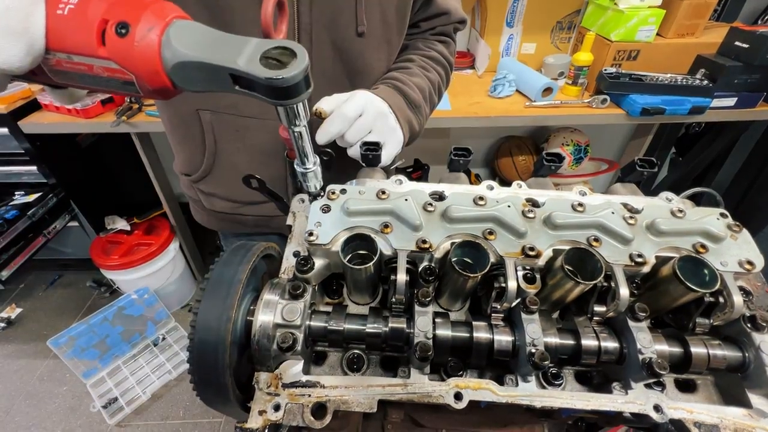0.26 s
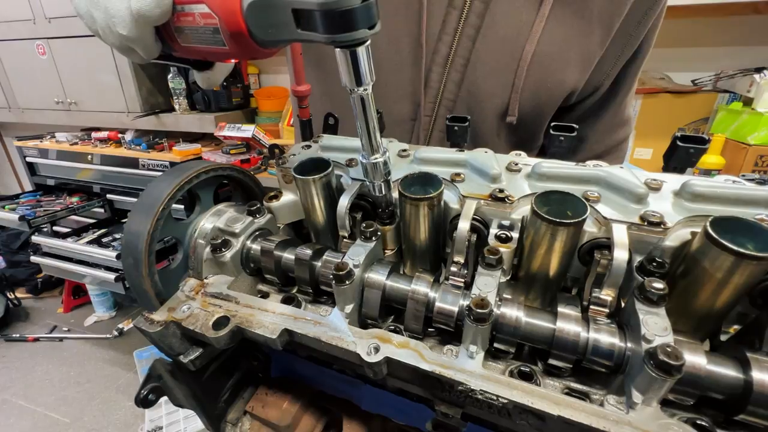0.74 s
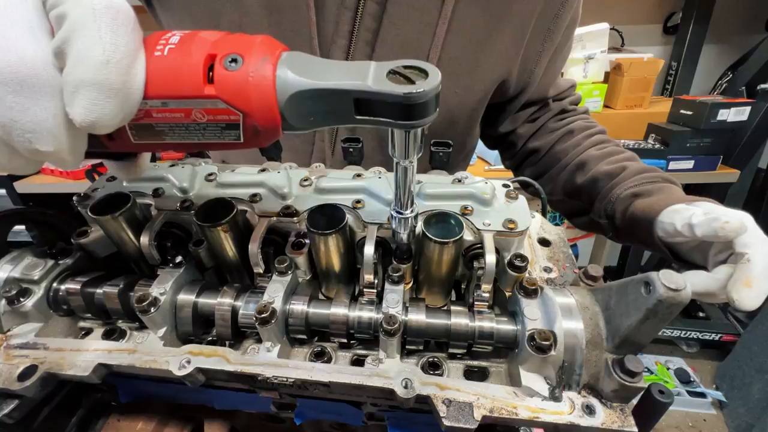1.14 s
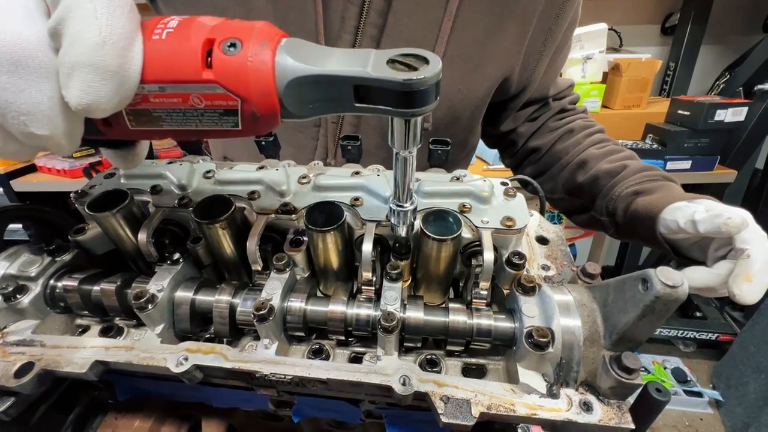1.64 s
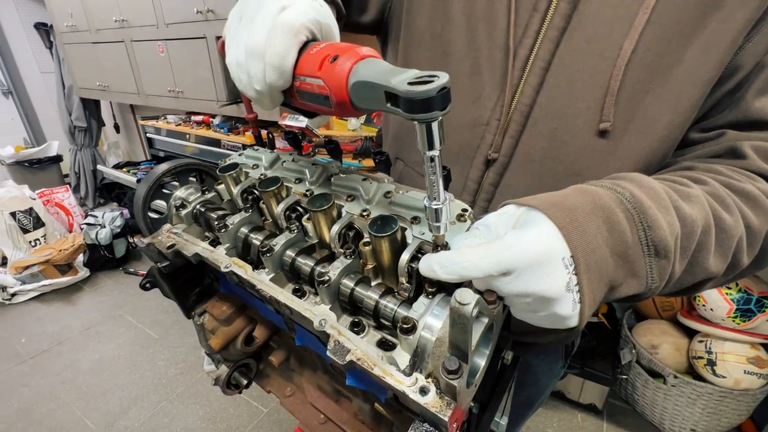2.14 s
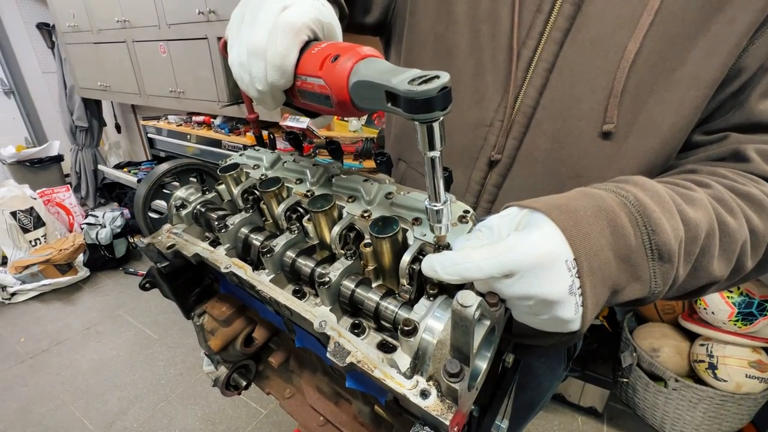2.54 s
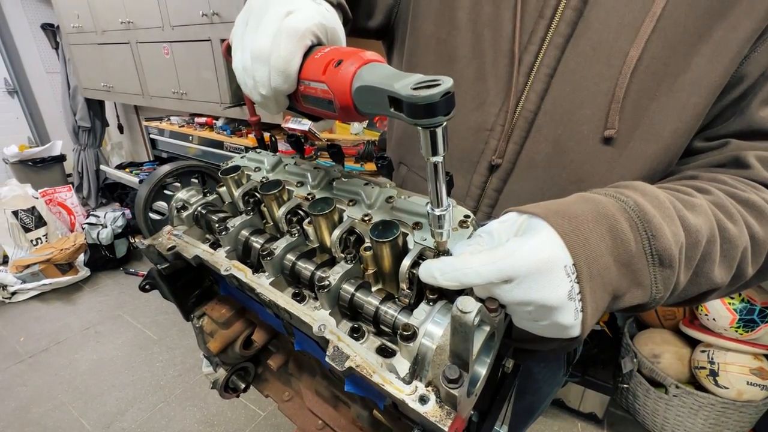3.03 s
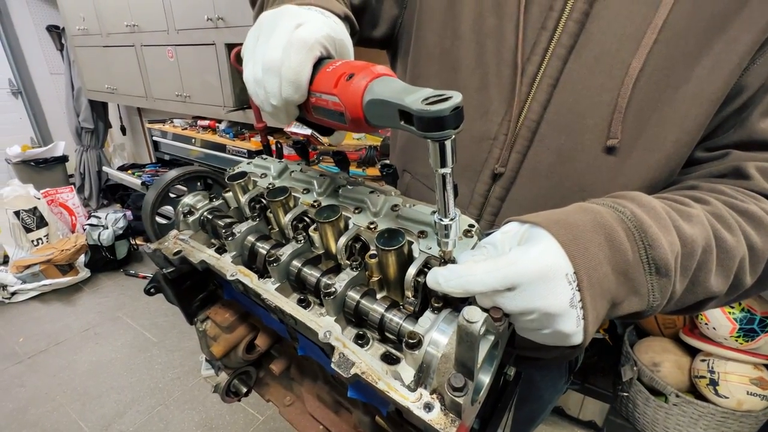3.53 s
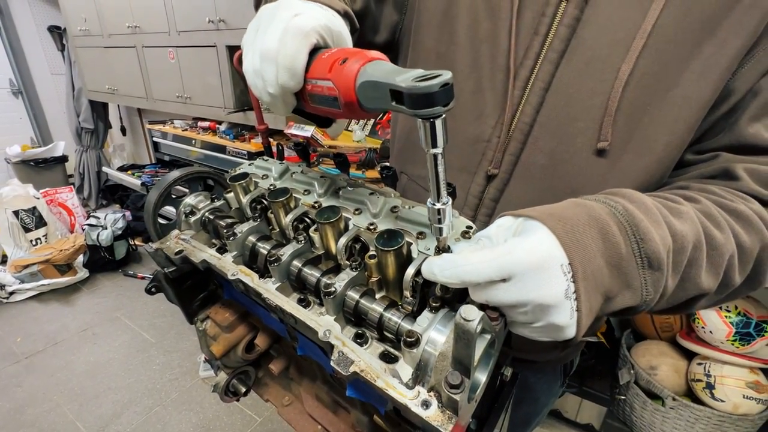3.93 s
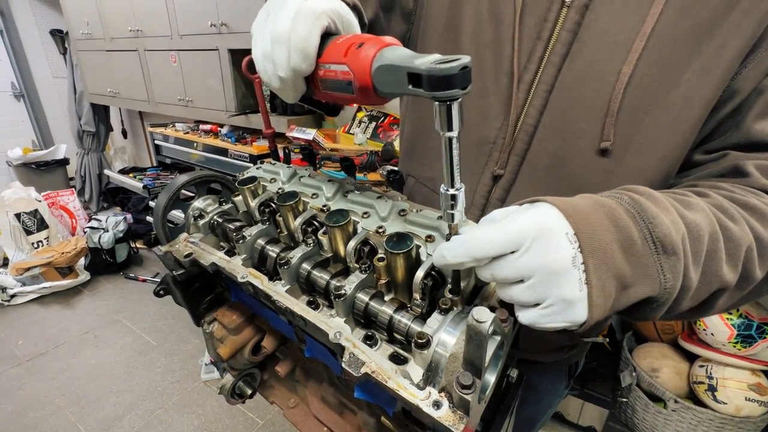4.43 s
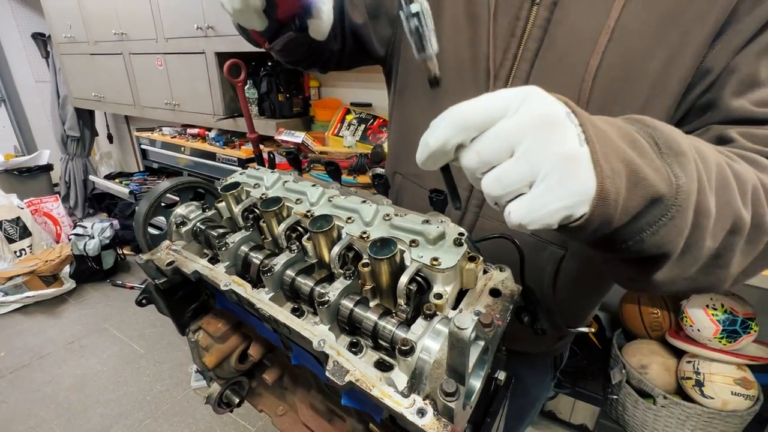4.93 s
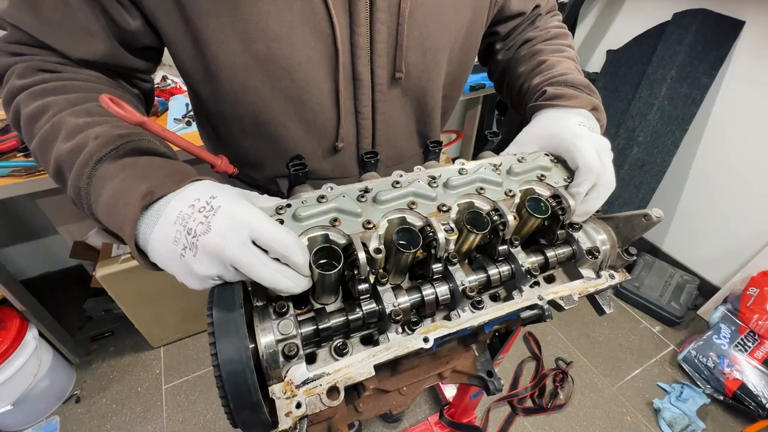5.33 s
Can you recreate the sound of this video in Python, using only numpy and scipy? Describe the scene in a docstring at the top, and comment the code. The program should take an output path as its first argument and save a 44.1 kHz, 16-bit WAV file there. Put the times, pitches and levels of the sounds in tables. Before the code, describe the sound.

Close harsh power-ratchet rasp in a garage, four butted fast runs, a slower clicking run cut off, then light socket rattle and metal clacks.

```python
"""A cordless ratchet spins bolts out of a cylinder head in a garage: four short runs at full speed, then a slow
one that stops dead. Its pawl skips three teeth on each back stroke, as noise puffs through resonances; gears
are swelling noise and tones. Then the socket is jiggled off the bolt and the cam carrier knocked loose, as
noise bursts and decaying modes, over low background noise and hiss. Two microphone ports hear the tool directly
and through the garage's echo."""
import sys
import numpy as np
from scipy import signal
from scipy.fft import rfft, irfft, next_fast_len
from scipy.io import wavfile
from scipy.ndimage import uniform_filter1d, map_coordinates

SR = 44100
rng = np.random.default_rng(int(sys.argv[2]) if len(sys.argv) > 2 else 0)


def generate_wav(signal):
    """Clip the signal to [-1, 1] and save it as 16-bit WAV at the path in sys.argv[1]."""
    frames = np.transpose(np.atleast_2d(signal))
    scaled = np.clip(frames, -1, 1) * 32767
    pcm = np.round(scaled).astype(np.int16)
    wavfile.write(sys.argv[1], SR, pcm)


N = 245637
FAST_END_S, SLOW_STOP_S, CARRIER_START_S = 1.733, 3.292, 5.19

# Three teeth dropping, then the pawl reseating [share of a stroke]
TEETH = [0, .093, .21, .4]
# Pawl resonances: (f/Hz, width/Hz, relative level/dB)
PAWL = [(9500, 1700, -13), (12930, 1800, 4), (14450, 1880, 6), (16230, 760, -3.5)]
# Fast runs: (start t/s, gear rasp level/dB, housing hum and rumble over the rasp/dB,
# relative pawl level/dB, a last column that is not played [s])
FAST_RUNS = [(0, -20, -12, -25.5, -26.5, 0.14), (0.348, -23, -11.5, -38, -23, .385),
             (.707, -21, -11.5, -30.5, -21.5, 1), (1.167, -18.5, -11.5, -26.5, -23, 1.28)]
# Fast drive: (t/s, stroke rate/Hz)
FAST_SPEED = [(0, 96.7), (.19, 83.1), (.34, 83.7), (.35, 88.6), (.4, 83.1), (.5, 76.9), (.6, 71.9),
              (.7, 69.6), (.712, 67.4), (.85, 67.9), (.9, 69), (.952, 76.4), (1.03, 84), (1.16, 84.7),
              (1.18, 95.1), (1.26, 92.5), (1.39, 94.3), (1.73, 94.5)]
# Single hard pawl snaps: (t/s, relative level/dB)
SNAPS = [(0.385, -8), (0.925, -13.5), (1.443, -9.5)]
# Colour of the fast gear rasp: (f/Hz, relative level/dB)
FAST_RASP = [(1300, -7.5), (1800, -3), (2200, -7), (2700, 0), (3400, 1.5), (4300, -3), (5000, 1.5),
             (5900, 0), (7000, -3), (8300, -2), (10000, -1.5), (11500, -0.5), (13000, -0.5), (16000, -32)]
# Housing resonances at speed, passed twice: (f/Hz, width/Hz, level per pass/dB)
FAST_HUM = [(747, 265, -3.5), (1040, 234, 2), (1540, 950, -7)]
# Gear mesh tone under load: (t/s, level/dB)
FAST_MESH = [(.3, -43.5), (.35, -33.5), (.42, -34), (0.599, -27.5), (0.701, -33), (0.711, -25), (.9, -24.5),
             (.952, -25), (0.961, -37.5), (1.03, -36.5)]
FAST_RASP_PER_OCTAVE_DB = 4.5  # rasp growth with speed inside a run
MESH_CYCLES_PER_STROKE = 14.4


def fast_runs():
    """At full speed the three teeth of each stroke merge into a buzz over gear rasp and a mesh tone."""
    rate, = curves(FAST_SPEED)
    stroke = np.cumsum(rate) / SR
    runs = np.array(FAST_RUNS)
    run = np.searchsorted(runs[:, 0] * SR, np.arange(N), side="right") - 1
    start, rasp_db, hum_db, rumble_db, pawl_db = runs[run].T[:5]
    octaves = np.log2(rate / rate[(start * SR).astype(int)])
    rasp_db = rasp_db + FAST_RASP_PER_OCTAVE_DB * octaves + 0.24 * wobble(13.27)
    pawl_db = pawl_db + 2.6 * wobble(40)

    # the clicks scatter in time and level
    first = np.flatnonzero(np.diff(np.floor(stroke)) > 0)
    chance = rng.standard_normal((len(first), 2, len(TEETH)))
    times = first[:, None] / SR + (np.array(TEETH) + 0.049 * chance[:, 0]) / rate[first, None]
    levels = pawl_db[first, None] + 4.3 * chance[:, 1] + [4.5, -0.5, -12.0, -3.5]
    snap_s, snap_db = np.transpose(SNAPS)
    times, levels = np.append(times, snap_s), np.append(levels, snap_db)
    pawl = resonant(bursts(times, levels + 22.0, 0.0042, clean=0.37, rise=0.0011), PAWL)

    hum_db = hum_db + 0.6 * wobble(9.3)
    rumble_db = rumble_db + 1.5 * wobble(15)
    rasp, hum = gears(stroke, FAST_RASP, FAST_HUM, hum_db, rumble_db, swell_db=0.5, swell_at=0.49,
                      grit_db=7.5, knock_db=11.5, thump=0.11)
    span = (FAST_MESH[0][0], FAST_MESH[-1][0])
    mesh = tone(MESH_CYCLES_PER_STROKE * rate, curves(FAST_MESH)[0], span, waver_hz=1.5, flutter_db=0.7)

    # each run has its own gear level, echo included
    gear = heard(rasp, glint_db=-5.5) + heard(hum, wet_db=-3.5, glint_db=-10.5)
    running = amp(rasp_db) * gear + heard(pawl) + direct(mesh, glint_db=-26)
    return between(0, FAST_END_S) * running


# Slow drive: (t/s, stroke rate/Hz)
SLOW_SPEED = [(1.7394, 20.11), (1.854, 25.9), (1.935, 17.52), (2.081, 34.31), (2.309, 33.42),
              (2.558, 30.81), (2.783, 31.68), (2.945, 44.22), (3.3, 43.91)]
# How hard the pawl drops: (t/s, relative level/dB)
SLOW_PAWL = [(1.78, -3.5), (1.83, -2), (2.11, 3.5), (2.19, -4), (2.28, -2.5), (2.36, 4), (2.41, -6.5),
             (2.5, 0), (2.58, -0.5), (2.67, 4.5), (2.75, -6), (2.84, -1.5), (2.92, 2), (2.99, -5.5),
             (3.08, -0.5), (3.16, 0.5), (3.21, -0.5), (3.29, -1)]
# Colour of the slow gear rasp: (f/Hz, relative level/dB)
SLOW_RASP = [(1300, -3), (1900, -3.5), (2500, -2.5), (3400, -0.5), (4300, -2.5), (5000, -0.5), (5900, 0),
             (7000, -4), (8300, -2.5), (10000, -5), (11500, -1.5), (13000, -8), (14500, -4.5), (16000, -9)]
# Housing resonances at low speed, passed twice: (f/Hz, width/Hz, level per pass/dB)
SLOW_HUM = [(751, 150, -2.5), (937, 184, -3), (1052, 120, 0.5), (1267, 220, -2.5), (1444, 365, -7)]
# Motor whine: (t/s, f/Hz)
WHINE = [(1.8, 8200), (1.85, 8250), (1.96, 8160), (2.06, 8360), (2.3, 8390), (2.5, 8340), (2.78, 8350),
         (2.92, 8520), (3.26, 8540)]
# Gear mesh tone: (t/s, f/Hz, level/dB)
SLOW_MESH = [(2.04, 940, -48.5), (2.2, 1010, -42.5), (2.4, 945, -42), (2.55, 926, -48), (2.7, 904, -45),
             (2.85, 990, -49)]
# A narrow hollow in the gear noise: (f/Hz, width/Hz, depth 0-1)
SLOW_DIP = [(1100, 52, .8)]
# Relative levels of the three teeth and the softer reseating [dB]
SLOW_TEETH_DB = [-11, -10.5, -10, -22]
SLOW_RASP_DB, SLOW_HUM_DB = -29.5, -36  # at 32 strokes per s
SLOW_RASP_PER_OCTAVE_DB, SLOW_HUM_PER_OCTAVE_DB = 5.5, 6  # growth with speed
SLOW_RUMBLE_DB, WHINE_DB, TOOTH_SCATTER_DB = -62.5, -43.5, 3.5


def slow_run():
    """With the trigger eased, every stroke is heard as three clicks until the motor brakes."""
    rate, = curves(SLOW_SPEED)
    stroke = np.cumsum(rate * (np.arange(N) >= SLOW_SPEED[0][0] * SR)) / SR
    count = np.arange(int(stroke[int(SLOW_STOP_S * SR)]) + 1)
    times = np.interp(count[:, None] + TEETH, stroke, np.arange(N) / SR)
    scatter_db = TOOTH_SCATTER_DB * np.tanh(rng.standard_normal(times.shape))
    levels = np.interp(times, *np.transpose(SLOW_PAWL)) + SLOW_TEETH_DB + scatter_db
    kept = times < SLOW_STOP_S
    pawl = resonant(bursts(times[kept], levels[kept] + 7.5, 0.0028, clean=2.8, rise=0.0003), PAWL)

    octaves = np.log2(rate / 32)
    rasp_db = SLOW_RASP_DB + SLOW_RASP_PER_OCTAVE_DB * octaves
    hum_db = SLOW_HUM_DB + SLOW_HUM_PER_OCTAVE_DB * octaves
    rasp, hum = gears(stroke, SLOW_RASP, SLOW_HUM, hum_db - rasp_db, SLOW_RUMBLE_DB - rasp_db,
                      swell_db=6.5, swell_at=0.085, grit_db=6.0, knock_db=20, thump=0.019)
    whine_span = (WHINE[0][0], WHINE[-1][0])
    whine_db = WHINE_DB + 2.4 * wobble(8.24)
    whine = tone(curves(WHINE)[0], whine_db, whine_span, waver_hz=5.2, flutter_db=-1.0)
    mesh_span = (SLOW_MESH[0][0], SLOW_MESH[-1][0])
    mesh = tone(*curves(SLOW_MESH), mesh_span, waver_hz=8, flutter_db=3.5)

    on = between(0, SLOW_STOP_S)
    gear = heard(rasp * on, glint_db=-5) + heard(hum * on, wet_db=-0.5, glint_db=-10)
    running = amp(rasp_db) * notched(gear, SLOW_DIP)
    running = running + heard(pawl, glint_db=-21.0) + direct(whine + mesh, glint_db=-11)
    return between(FAST_END_S, 9) * running


# Colour of the tool's low rumble: (f/Hz, relative level/dB)
RUMBLE = [(25, -30), (70, -8), (190, -3.5), (300, -1.5), (550, 2), (800, -3.5)]
# The tool's shaking at 1-7 times the stroke rate: relative level/dB
SHAKE_DB = [1.5, 2, 1, 0.5, -2.5, -1, -3.5]


def gears(stroke, rasp, hum, hum_db, rumble_db, swell_db, swell_at, grit_db, knock_db, thump):
    """Gear noise swells once a stroke; the yoke knocks as it takes up the load."""
    swell = amp(swell_db * np.cos(2 * np.pi * (stroke - swell_at)) + 0.7 * wobble(14))
    grit = amp(grit_db * np.tanh(wobble(900)))  # tooth contacts make the noise spiky
    turn = np.flatnonzero(np.diff(np.floor(stroke - TEETH[3])) > 0) / SR
    knock_levels = knock_db + 2.5 * wobble(80)[(turn * SR).astype(int)]
    knocks = bursts(turn, knock_levels, 0.004, clean=1.5, rise=0.0005)
    drive = unit(swell * grit * rng.standard_normal(N)) + knocks

    housing_noise = amp(0.35 * wobble(29.0)) * np.sqrt(swell) * rng.standard_normal(N)
    body = unit(resonant(resonant(housing_noise, hum), hum))

    # the rocking yoke shakes the tool at multiples of the stroke rate
    shake = np.zeros(N)
    for order, db in enumerate(SHAKE_DB, start=1):
        level = amp(db + 2.4 * wobble(22))
        shake += level * np.sin(2 * np.pi * order * stroke + 0.8 * wobble(10))
    low = shaped(np.sqrt(swell) * rng.standard_normal(N) + thump * shake, RUMBLE)
    return shaped(drive, rasp), amp(hum_db) * body + amp(rumble_db) * low


def tone(hz, db, span, waver_hz, flutter_db):
    """A slightly unsteady line inside a span of seconds."""
    turns = np.cumsum(hz + waver_hz * wobble(40)) / SR
    level = np.sqrt(2) * amp(db + flutter_db * wobble(60))
    return level * np.sin(2 * np.pi * turns) * between(*span)


def handling():
    """The socket comes off the bolt amid scuffing; later the carrier is knocked, its stereo tilt reversed."""
    sliding = scuffs() * between(SCUFF[0][0], CARRIER_START_S)
    lifted = heard(sliding + socket_blows(), side=0.97)
    knocked = heard(carrier_blows(), side=-0.45, wet_db=-9.0, glint_db=-11)
    return lifted * between(0, CARRIER_START_S) + knocked


# Single socket blows: (t/s, crack level/dB, thud and tick over the crack/dB, ring level/dB), relative
TAPS = [(3.6306, -18.5, -15, -20, -90), (3.647, -17.5, -20, -29, -90), (3.712, -23.5, -16.5, -18, -90),
        (3.734, -22.5, -13, -20, -90), (3.96, -46, -14, -22, -90), (3.9791, -34, -17, -22, -88),
        (3.995, -31, -16, -19, -90), (4.01, -38, -9, -19, -90), (4.025, -43.5, -4.5, -16, -90),
        (4.2036, -47.5, 1.5, -24, -90), (4.23, -47, -3, -12, -90), (4.3702, -50, -6, 0, -90),
        (4.385, -49, -3, -14, -90), (4.402, -46, -8, -13, -92), (4.42, -43, -9, -12, -90),
        (4.714, -60, -2, -20, -90), (4.8583, -31.5, -15.5, -6, -67), (4.8748, -29.5, -25, -5, -47),
        (5.0284, -57, 0.5, -21, -85)]
# Socket modes: (f/Hz, relative level/dB, decay by 60 dB t/s)
SOCKET = [(6830, -5, .12), (6901, -4, .17), (6949, -4, .2), (7068, -7, .12), (8393, -11, .12)]


def socket_blows():
    """The socket taps and rattles against the bolt, ringing when struck freely."""
    thud = [(826, 160, -1.5), (1500, 900, -4), (3300, 540, -7.5)]  # (f/Hz, width/Hz, dB)
    return contacts(TAPS + rattles(), SOCKET, thud, crack_t60=0.015, thud_t60=0.069)


# Socket rattles: (start t/s, length t/s, hardest at share 0-1, crack level/dB, thud and tick over it/dB)
RATTLES = [(3.657, 0.042, 0.41, -14.5, -20.5, -14)]
RATTLE_GAP_S, RATTLE_SCATTER_DB = 0.006, 0.5
RATTLE_FALL_DB = -11  # a whole length away from the hardest contact


def rattles():
    """Loose contacts at uneven gaps, too damped to ring: rows like the single blows."""
    rows = []
    index = np.arange(12)
    for start, length, hardest, db, thud_db, tick_db in RATTLES:
        chance = rng.standard_normal((12, 4))
        s = RATTLE_GAP_S * (index + 0.41 * np.tanh(chance[:, 0]) * (index > 0))
        fall_db = RATTLE_FALL_DB * np.abs(s / length - hardest)
        levels = RATTLE_SCATTER_DB * np.tanh(chance[:, 1:]) + [db, thud_db, tick_db]
        for at, fall, (crack, thud, tick) in zip(s, fall_db, levels):
            if at <= length:
                rows.append((start + at, crack + fall, thud, tick, -120))
    return rows


# Carrier blows: (t/s, crack level/dB, thud and tick over the crack/dB, ring level/dB,
# clack f/Hz, clack level/dB); crack, thud, tick and ring are relative
KNOCKS = [(5.2538, -41, -20, -30, -80, 3250, -47), (5.292, -66, 4, -30, -90, 900, -57),
          (5.3267, -47, -14, -15.5, -80, 2810, -48), (5.3556, -52, -14, -15, -80, 3700, -60),
          (5.3668, -32.5, -7.5, -19, -45, 2750, -29), (5.373, -41, -1, -23, -50.5, 1300, -41.5),
          (5.3994, -51, -1, -28, -72, 2300, -58.5), (5.473, -40.5, -3, -20, -59, 1900, -38.5),
          (5.5164, -57, -8, -11, -80, 4270, -61)]
# Carrier modes: (f/Hz, relative level/dB, decay by 60 dB t/s)
CARRIER = [(290, 1.5, .14), (498, -7.5, 0.19), (684, -6.5, 0.24), (856, -7, 0.34), (905, -10, .15),
           (1730, -16, 0.14), (2240, -12, .08), (2420, -3, .1), (2710, 1.5, .12), (3300, -18, .2),
           (4410, -2.5, .45), (8726, -2.5, 0.099)]


def carrier_blows():
    """The knocked carrier thuds and rings in its own modes, with a clack at each blow."""
    thud = [(490, 260, 6.9), (927, 730, -2), (2200, 1200, 3), (3050, 440, 3.6)]  # (f/Hz, width/Hz, dB)
    return contacts(KNOCKS, CARRIER, thud, crack_t60=0.01, thud_t60=0.04) + clacks()


def clacks():
    """Each carrier blow lands on another spot, which answers with its own short note."""
    out, t = np.zeros(N + SR), np.arange(SR // 10) / SR
    for s, *_, hz, db in KNOCKS:
        note = amp(db - 60 * t / 0.021) * np.sin(2 * np.pi * hz * t)  # 60 dB down in 21 ms
        out[round(s * SR):][:len(t)] += note
    return out[:N]


RING_RISE_CYCLES = 1.5
RING_BUZZ_DB = 4.5  # at 500 Hz, less on higher modes


def contacts(events, modes, thud, crack_t60, thud_t60):
    """Each contact is a crack, a bright tick and a dull thud, and rings the part."""
    s, db, thud_db, tick_db, ring_db = np.transpose([row[:5] for row in events])
    band = lambda hz: signal.butter(N=4, Wn=hz, btype="band", fs=SR, output="sos")
    crack = signal.sosfilt(band([1500, 9500]), bursts(s, db - 3, crack_t60, clean=1.5, rise=0.0009))
    tick = signal.sosfilt(band([7000, 14500]), bursts(s, db + tick_db + 11, 0.0028))
    dull = resonant(bursts(s, db + thud_db + 11.0, thud_t60), thud)
    out = np.pad(crack + tick + dull, (0, SR))
    t = np.arange(SR // 2) / SR
    for at, level_db in zip(s, ring_db):
        ring = np.zeros(len(t))
        for hz, mode_db, t60 in modes:
            buzz_db = RING_BUZZ_DB * np.sqrt(500 / hz) * wobble(70)[:len(t)]
            level = amp(mode_db + rng.normal(0, 1.5) + buzz_db - 60 * t / t60)
            rise = 1 - np.exp(-t * hz / RING_RISE_CYCLES)
            ring += level * rise * np.sin(2 * np.pi * hz * t)
        out[round(at * SR):][:len(t)] += amp(level_db) * ring
    return out[:N]


# Gloves and steel sliding: (t/s, low rustle level/dB, rub level/dB, fine hiss level/dB)
SCUFF = [(3.626, -52, -64, -77), (3.86, -67, -79, -86), (4.02, -66, -73, -84), (4.19, -76, -70, -88),
         (4.22, -67, -69, -80), (4.33, -72, -70.5, -86), (4.41, -68, -69, -80), (4.5, -76, -70.5, -92),
         (4.63, -76, -70, -94), (4.67, -82.5, -83, -96), (4.72, -73, -74, -96), (4.77, -82, -78, -96),
         (4.845, -92, -69, -94.5), (4.9, -76, -68, -79), (5.015, -86.5, -78, -82), (5.035, -69.5, -73, -77),
         (5.18, -81, -72, -73)]
# Colour of the rub: (f/Hz, relative level/dB)
SCUFF_COLOUR = [(2500, -5), (3500, -8), (5000, -2), (7000, -1), (9000, -1.5), (10500, -3.5)]


def scuffs():
    """Gloves and steel slide close by: grainy noise in a low, a middle and a fine band."""
    rustle_db, rub_db, fine_db = curves(SCUFF)
    grain = amp(1.6 * wobble(200) + 0.86 * wobble(25))
    grainy = lambda colour: shaped(grain * rng.standard_normal(N), colour)
    rub = amp(rub_db + 1.4 * wobble(5.0)) * grainy(SCUFF_COLOUR)
    rustle = amp(rustle_db) * grainy([(650, -1.0), (900, -5.0), (1500, -0.5), (2400, -5)])
    fine = amp(fine_db + 1.5 * wobble(6)) * grainy([(10500, 3), (13000, -2), (15000, -5), (16000, -13)])
    return rub + rustle + fine


# Low background noise, dropping after the tool stops and then swelling back: (t/s, deep level/dB, upper
# level/dB)
AIR = [(3.3, -68, -68), (3.4, -80, -87), (3.7, -74.5, -78), (4.2, -68, -70), (4.42, -71, -75),
       (4.48, -69, -64), (4.7, -67, -70), (4.8, -68.5, -71), (5.1, -66, -71.5), (5.3, -64.5, -63),
       (5.45, -62, -59)]
# Colours of the deep and upper noise, then of the hiss: (f/Hz, relative level/dB)
DEEP_AIR = [(25, -3.5), (45, -1), (110, -0.5), (150, -5)]
UPPER_AIR = [(170, -1.5), (330, 2.5), (480, -8.5), (600, -12.5)]
HISS = [(300, 2.5), (2000, 3), (5000, -8.5), (10000, -13.5), (12500, -27.5)]


def room_tone():
    """Low background noise, partly shared by both ports, over a thin hiss that steps up at the carrier."""
    deep_db, upper_db = curves(AIR)
    pair = lambda: rng.standard_normal(N) + rng.standard_normal((2, N))  # shared part plus own part
    deep = amp(deep_db + 0.96 * wobble(9.8)) * shaped(pair(), DEEP_AIR)
    upper = amp(upper_db + 1.2 * wobble(7.1)) * shaped(pair(), UPPER_AIR)
    hiss_db = np.where(np.arange(N) < CARRIER_START_S * SR, -81, -72)
    return deep + upper + amp(hiss_db) * shaped(rng.standard_normal((2, N)), HISS)


# Garage echo: (f/Hz, decay by 60 dB t/s, relative echo level/dB)
GARAGE = [(200, 0.13, -2), (994, 0.34, -7), (3080, 0.35, -2.5), (7550, 0.41, -6), (9050, 0.27, -1),
          (10550, 0.25, -14), (13870, 0.31, -18)]


def heard(x, side=1, wet_db=0., glint_db=-7.5):
    """The garage adds a separate tail at each port, which keeps changing as tool and body move."""
    step = SR // 7
    noise = rng.standard_normal((N // step + 2, 2, 3 * step))
    hz, t, z = signal.stft(noise, SR, nperseg=256)
    decay = amp(-60 * t / along(GARAGE, hz)[:, None])
    tails = signal.istft(z * decay, SR, nperseg=256)[1]
    echo = shifting(np.pad(x, (130, 0))[:N], tails, step)  # the echo starts about 3 ms late
    half = side * np.array([[.5], [-.5]])
    colour = lambda f: amp(wet_db + along(GARAGE, f, axis=2) + half * along(TILT, f))
    return direct(x, side, glint_db) + filtered(echo, colour)


# Phase by which the left port leads: (f/Hz, phase/rad)
LEAD = [(0, 1), (950, 1.45), (1210, 2.0), (2580, 2.5), (3700, 5.5), (3960, 4.5), (5680, 4.5), (6460, 7.5),
        (7490, 8), (8350, 7.5), (9730, -1.5), (10200, -2.5), (13000, -5.5), (16100, -9)]
# Left port over right, scaled by side: (f/Hz, level/dB)
TILT = [(60, 11.5), (110, 12), (200, 14), (380, 6.5), (700, 4), (1290, 2.5), (2380, 1), (4400, 5.5),
        (8120, 4), (15000, -1)]


def direct(x, side=1, glint_db=-8.0):
    """The ports hear the source with unequal delay and level, each with shifting glints off the nearby steel."""
    t, step = np.arange(SR // 50) / SR, SR // 24
    glints = rng.standard_normal((N // step + 2, 2, len(t))) * amp(-60 * t / 0.014) * (t > 0.0005)
    half = np.array([[.5], [-.5]])
    lead = lambda f: np.exp(1j * half * np.interp(f, *np.transpose(LEAD)))
    both = amp(glint_db) * shifting(x, glints, step) + filtered(x, lead)
    return filtered(both, lambda f: amp(side * half * along(TILT, f)))


def shifting(x, answers, step):
    """x heard through pairs of answers that take over from each other every step samples."""
    count = len(answers)
    padded = np.pad(x, (step, 3 * step))
    fade = np.sin(np.pi * np.arange(2 * step) / (2 * step))
    pieces = np.array([padded[k * step:][:2 * step] * fade for k in range(count)])
    even = answers / np.linalg.norm(answers, axis=2, keepdims=True)  # equal energy
    out = np.zeros((2, (count + 6) * step))
    for k, answer in enumerate(signal.fftconvolve(pieces[:, None], even, axes=2)):
        out[:, k * step:][:, :answer.shape[1]] += answer
    return out[:, step:step + N]


def bursts(times, levels_db, t60, clean=0., rise=0.000096):
    """A puff of noise at each time, 60 dB down after t60, plus a clean impulse."""
    kicks = np.bincount(np.clip(times * SR, 0, N - 1).astype(int), amp(levels_db), N)
    t = np.arange(int(t60 * SR) + 2) / SR
    envelope = amp(-60 * t / t60) * (1 - np.exp(-t / rise))
    puffs = signal.fftconvolve(kicks, envelope)[:N] * rng.standard_normal(N)
    return puffs + clean * kicks


def resonant(x, modes):
    """x through (f/Hz, width/Hz, level/dB) resonances of alternating polarity."""
    def response(f):
        total = 0
        for k, (c, w, db) in enumerate(modes):
            total = total + (-1) ** k * amp(db) * 1j * f * w / (c * c - f * f + 1j * f * w)
        return total
    return filtered(x, response)


def shaped(x, points):
    """x coloured by (f/Hz, level/dB) points, closed outside them, rms 1."""
    closed = [(points[0][0] * 0.6, -60), *points, (points[-1][0] * 1.3, -60)]
    return unit(filtered(x, lambda hz: amp(along(closed, hz))))


def notched(x, notches):
    """x with narrow (f/Hz, width/Hz, depth 0-1) hollows."""
    hollow = lambda f, c, w, d: 1 - np.clip(d, 0, 1) / (1 + (2 * (f - c) / w) ** 2)
    return filtered(x, lambda f: np.prod([hollow(f, *notch) for notch in notches], axis=0))


def filtered(x, response):
    """x times a complex response of frequency."""
    m = next_fast_len(N + SR // 2)
    return irfft(rfft(x, m) * response(np.fft.rfftfreq(m, 1 / SR)), m)[..., :N]


def wobble(rate):
    """A smooth random curve, rate knots a second."""
    knots = rng.standard_normal(int(N * rate / SR) + 4)
    return map_coordinates(knots, [np.arange(N) * rate / SR])


def between(start, end):
    """1 inside a span of seconds, with 3 ms edges."""
    gate = 1. * (np.arange(N) >= start * SR) * (np.arange(N) < end * SR)
    return uniform_filter1d(gate, size=132, mode="nearest")


def curves(rows):
    """One value per sample for each column after the time."""
    s, *cols = np.transpose(rows)
    return [np.interp(np.arange(N) / SR, s, c) for c in cols]


def along(points, hz, axis=1):
    """One column of (f/Hz, value, ..) points on a log axis."""
    table = np.array(points)
    return np.interp(np.log(hz + 1), np.log(table[:, 0] + 1), table[:, axis])


def amp(db):
    """Decibels to gain."""
    return 10 ** (np.asarray(db) / 20)


def unit(x):
    """Scaled to rms 1."""
    return x / np.sqrt(np.mean(x ** 2) + 1e-20)


def scene():
    """All sources at the two microphone ports."""
    return fast_runs() + slow_run() + handling() + room_tone()


# Microphone port cavities: (f/Hz, width/Hz, depth 0-1)
NOTCHES = [(5300, 140, 0.8), (7625, 270, 1)]
TOP_HZ = 16200


def record(dry):
    """The port cavities notch two narrow bands, loud peaks are rounded off and the band ends at its limit."""
    edge = lambda f: np.sin(np.pi / 2 * np.clip((TOP_HZ - f) / 350, 0, 1)) ** 2
    coloured = notched(dry, NOTCHES)
    rounded = coloured / (1 + np.abs(coloured / 0.95) ** 4) ** (1 / 4)
    return filtered(rounded, edge)


dry = scene()
out = record(dry)
generate_wav(out)
```